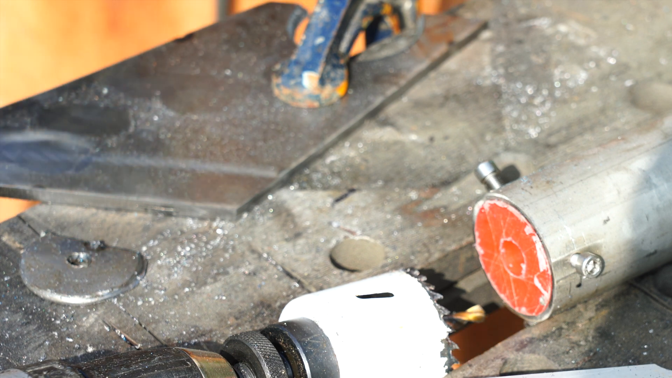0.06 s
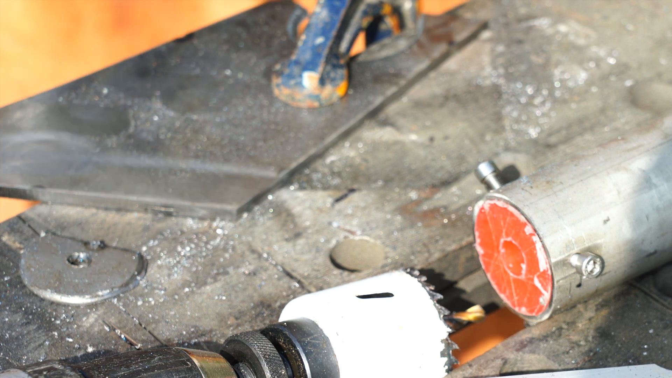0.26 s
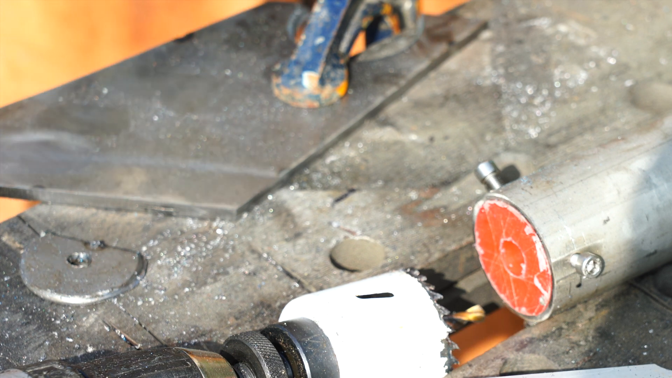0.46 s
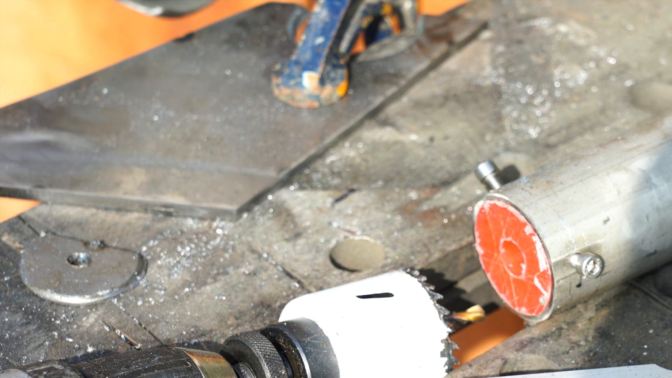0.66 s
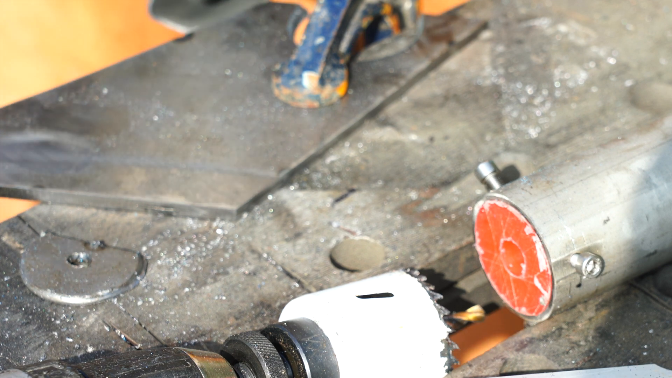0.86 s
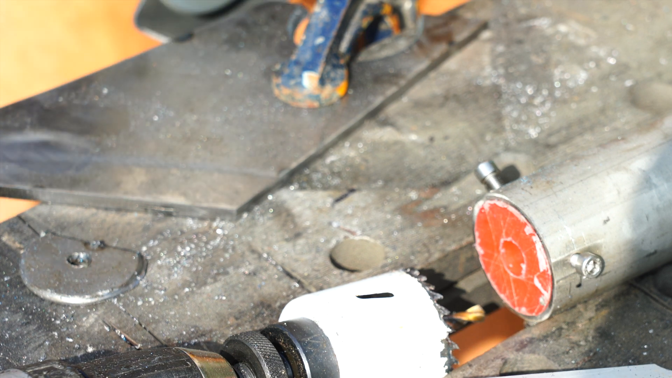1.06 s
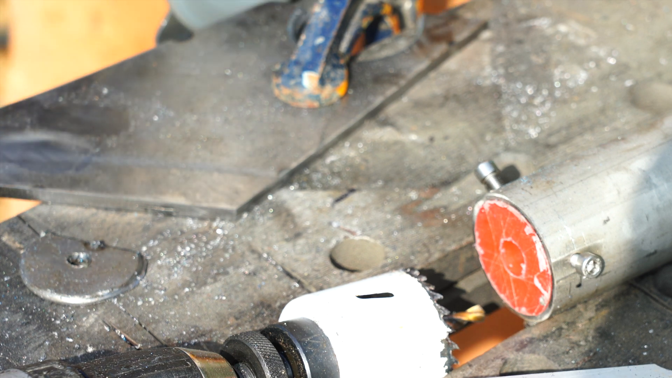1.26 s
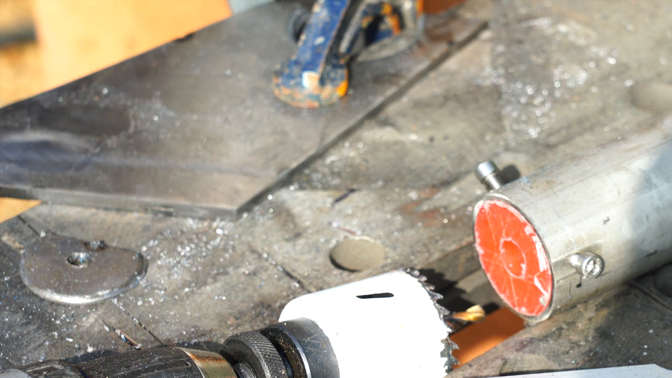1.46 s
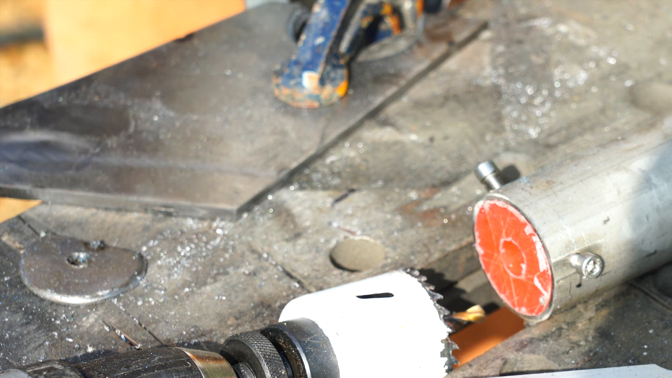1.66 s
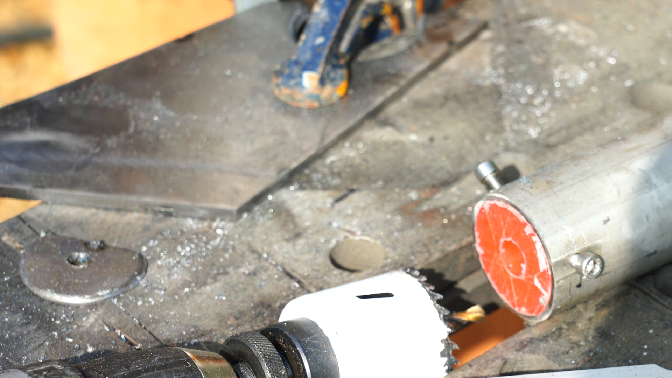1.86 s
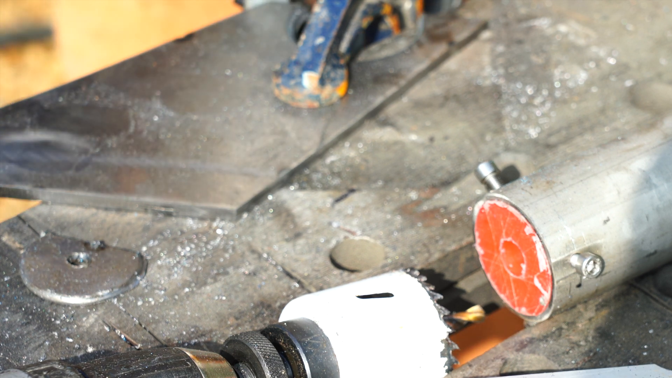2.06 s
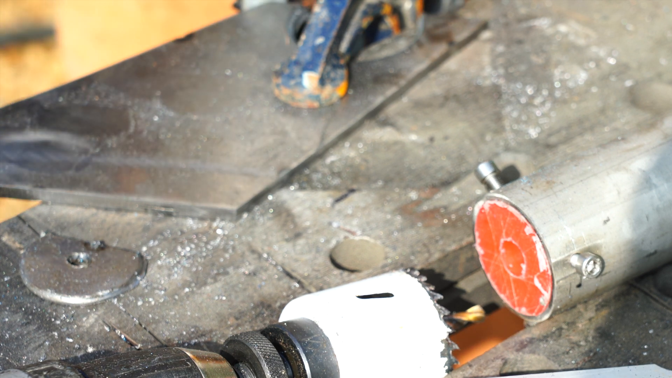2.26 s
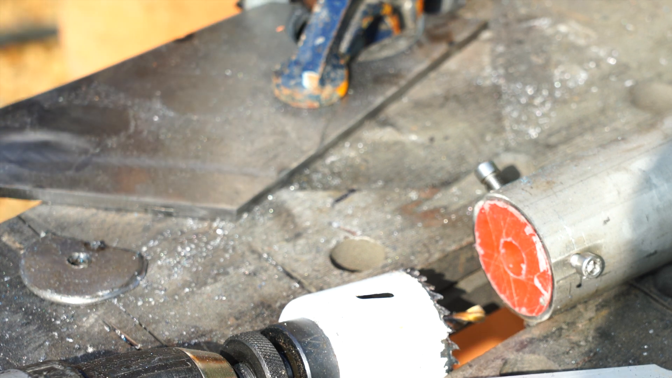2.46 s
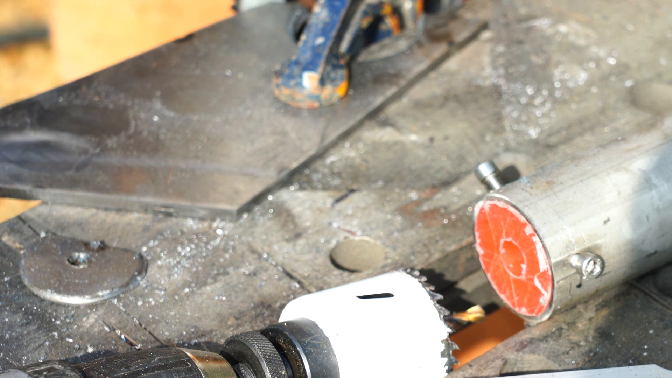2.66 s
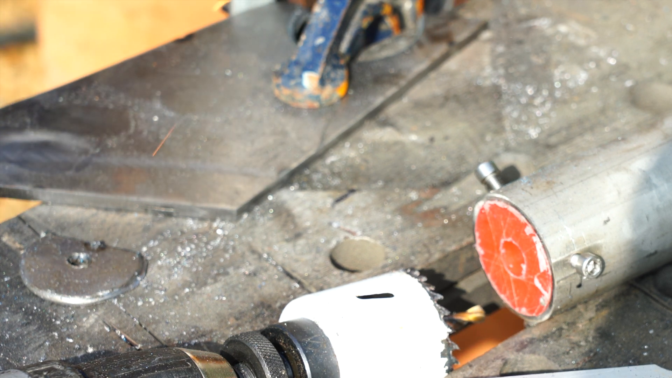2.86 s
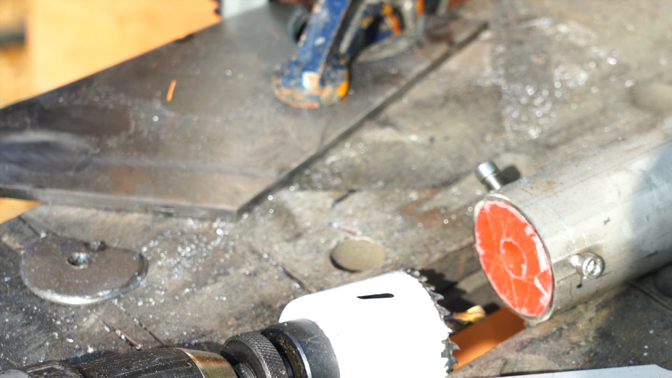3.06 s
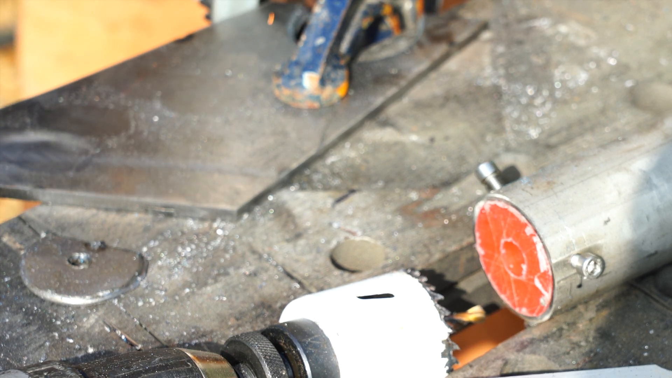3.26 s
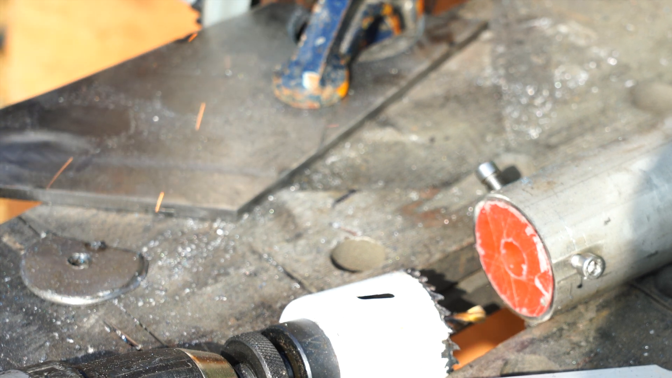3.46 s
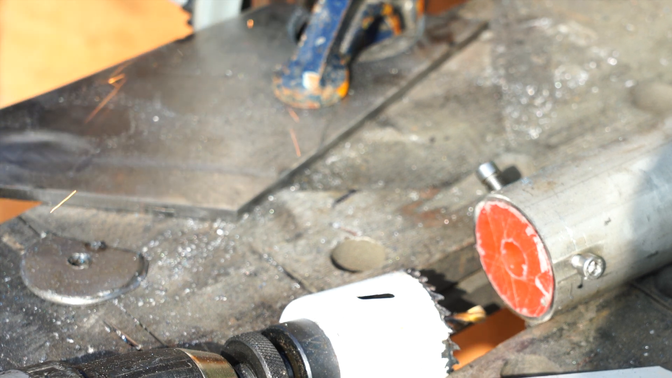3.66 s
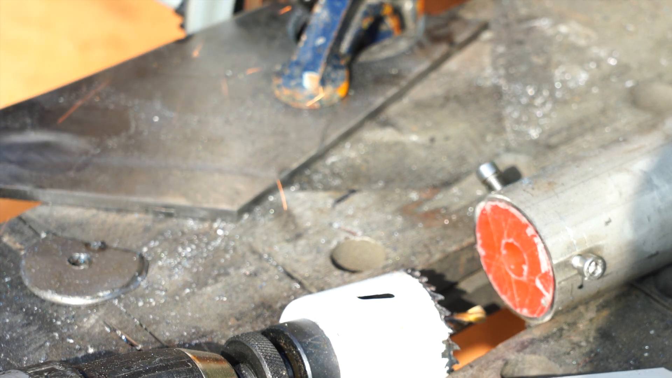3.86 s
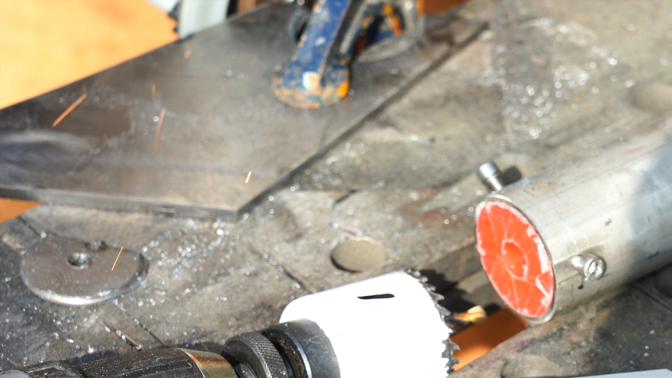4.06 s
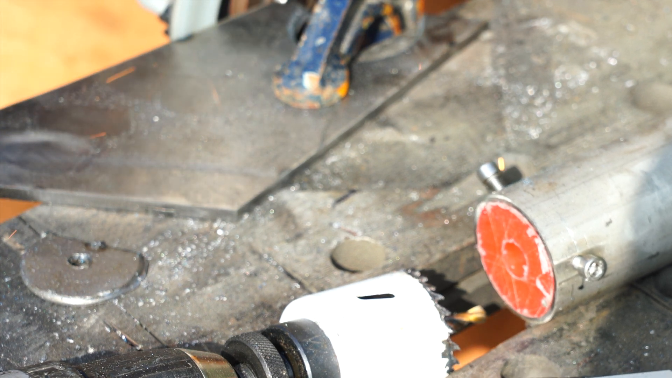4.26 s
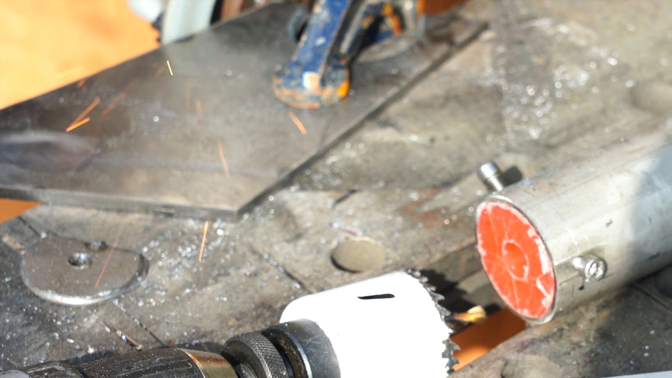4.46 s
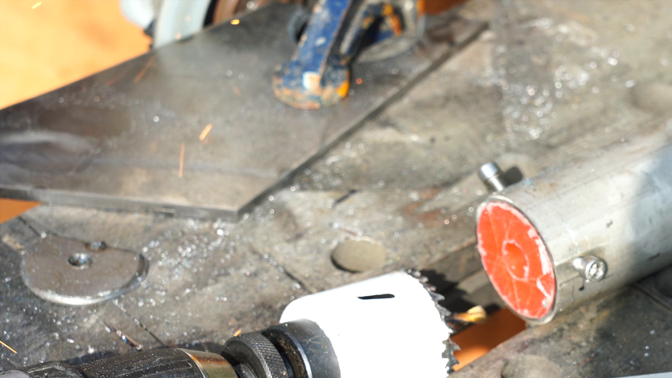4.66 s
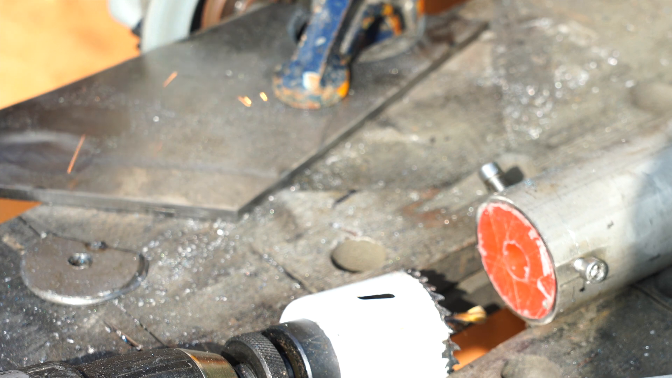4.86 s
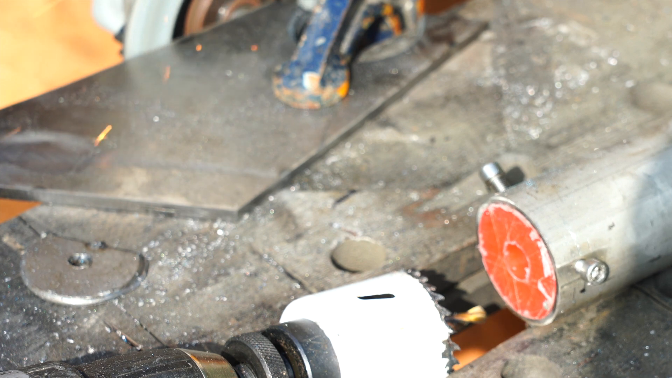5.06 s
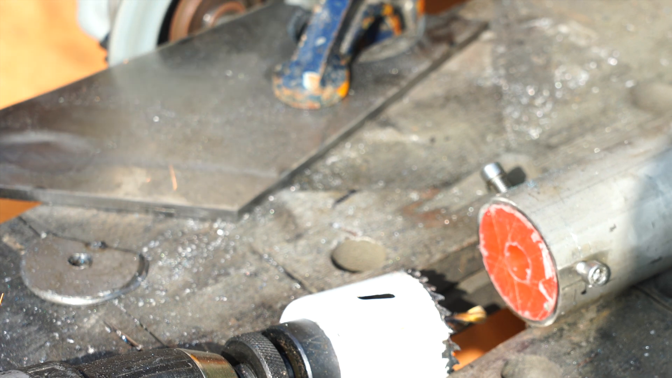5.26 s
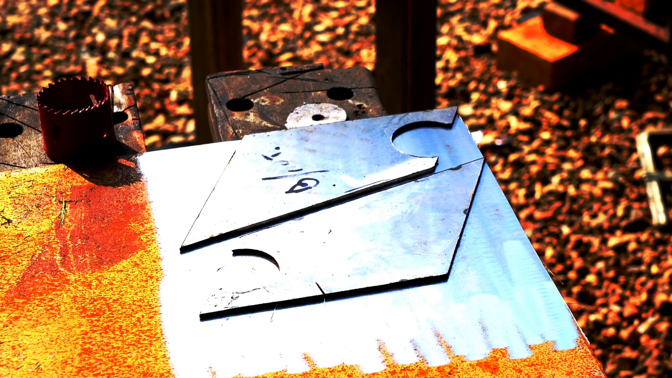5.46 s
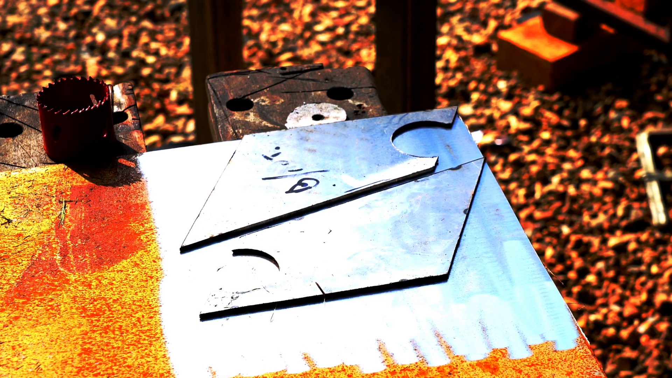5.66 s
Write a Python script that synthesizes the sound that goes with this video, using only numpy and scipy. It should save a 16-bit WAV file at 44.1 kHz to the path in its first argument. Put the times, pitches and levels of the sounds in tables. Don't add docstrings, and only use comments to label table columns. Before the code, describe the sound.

Quiet workshop air with cloth rustle, small knocks and a tiny squeak, then a sharp switch click. An angle grinder runs up with chattering gears into a bright free whir. An abrupt cut brings loud, harsh flap-disc grinding on steel, its pitch sagging under load while metallic tones sing. Close stereo microphones; at the very end it cuts to quiet outdoor air with wind and a far engine.

```python
import sys
import numpy as np
from scipy import signal
from scipy.fft import rfft, irfft
from scipy.io import wavfile
from scipy.ndimage import uniform_filter1d, map_coordinates

SR = 44100
rng = np.random.default_rng(int(sys.argv[2]) if len(sys.argv) > 2 else 0)


def file_out(sig):
    cols = np.atleast_2d(sig).T
    lim = np.clip(cols, -1, 1)
    pcm = np.round(lim * 32767).astype(np.int16)
    wavfile.write(sys.argv[1], SR, pcm)


def invert_db(x):
    u = np.asarray(x, float) / 20
    return 10 ** u


N = 252075
ON, BEAT, TOUCH, OFF = 0.7765, 0.7778, 2.136, 5.468
PINION, CROWN, BLADES, FLAPS = 10, 37, 31, 80
MAINS_HZ = 50.1
DISC_HUM_DB = -59
SIDES = np.array([[0.5], [-0.5]])


def evened(x):
    return x / np.sqrt(np.mean(x ** 2) + 1e-20)


def read(points, hz):
    f, value = np.transpose(points)
    return np.interp(np.log(hz + 1), np.log(f + 1), value)


def curve(rows, t):
    s, *columns = np.transpose(rows)
    return [np.interp(t, s, c) for c in columns]


def bumps(modes, hz):
    return sum(db / (1 + (2 * (hz - f) / width) ** 2) for f, width, db in modes)


def window(t0, t1, rise, fall):
    t = np.arange(N) / SR
    return np.clip(np.minimum((t - t0) / rise, (t1 - t) / fall), 0, 1)


def smooth(x, size):
    return uniform_filter1d(x, size=size)


def ringing(drive, hz, width):
    r = np.exp(-np.pi * width / SR)
    return evened(signal.lfilter([1, 0, -1], [1, -2 * r * np.cos(2 * np.pi * hz / SR), r * r], drive))


# (frequency [Hz], likeness [0-1])
PORT_LIKENESS = [(60, 0.77), (300, 0.96), (1400, 0.97), (3000, 0.82), (4500, 0.84), (6300, 0.91),
                 (7500, 0.66), (12000, 0.63), (15000, 0.16)]
# (frequency [Hz], lead [radians])
PORT_LEAD = [(0, 0.3), (6630, 0), (7490, 1.3), (8440, 0.3), (9130, 1.3), (9650, 0.3), (10700, 1.1),
             (11600, 0.9), (13800, 0.9), (14600, 1.3), (15200, 0.5), (15700, 1.4), (16600, 0)]
# (frequency [Hz], left-right level [dB])
PORT_TILT = [(300, -0.5), (1400, 0), (3000, 3), (5000, 0), (8000, -2), (14000, 2.5)]


def colour(pair, shape, size, patchy_db, pan_db=0, apart=1):
    hz, t, (a, b) = signal.stft(pair, SR, nperseg=size, noverlap=size * 3 // 4)
    hz = hz[:, None]
    colour_db, level_db = shape(hz, t)
    gain = invert_db(colour_db)
    patches = uniform_filter1d(rng.standard_normal(a.T.shape).T, size=size // 80, axis=0)
    patches = uniform_filter1d(patches, size=20480 // size, axis=1)
    gain = gain / np.sqrt((gain ** 2).mean(0)) * invert_db(level_db + patchy_db * evened(patches))
    same = np.clip(read(PORT_LIKENESS, hz), 0, 1) ** apart
    right = same * a * np.exp(-1j * read(PORT_LEAD, hz)) + np.sqrt(1 - same ** 2) * b
    tilt_db = read(PORT_TILT, hz)
    z = np.array([a * invert_db(tilt_db / 2), right * invert_db(-tilt_db / 2)]) * gain
    sound = signal.istft(z, SR, nperseg=size, noverlap=size * 3 // 4)[1][:, :pair.shape[1]]
    return sound * invert_db(SIDES * pan_db)


def tones(speed, orders, levels_db, wobble):
    turns, out = np.cumsum(speed) / SR, np.zeros((2, len(speed)))
    for k, db in zip(orders, levels_db):
        drift = wobble * np.sqrt(k) * evened(smooth(rng.standard_normal(len(speed)), 1500))
        lead = read(PORT_LEAD, k * speed) * SIDES
        out += np.sqrt(2) * invert_db(db) * np.cos(2 * np.pi * k * turns + drift + lead)
    return out


def runup(t):
    top_speed, from_s, time_constant_s = 509.0, 0.8059, 0.3525
    return np.maximum(top_speed * (1 - np.exp(np.minimum((from_s - t) / time_constant_s, 0))), 20)


# (time [s], motor speed [turns/s])
LOADED_SPEED = [(2.13, 498.3), (2.27, 497.3), (2.35, 490.8), (2.45, 474.5), (2.55, 453.9), (2.75, 405.8),
                (2.85, 386.9), (2.95, 372.2), (3.05, 361.6), (3.2, 349.8), (3.5, 335.8), (3.7, 325.3),
                (4.0, 318.0), (4.3, 313.2), (4.6, 319.6), (4.76, 321.0), (5.0, 308.8), (5.48, 300.7)]


def loaded_speed(t):
    return curve(LOADED_SPEED, t)[0]


def load_of(t):
    return np.clip((500 - loaded_speed(t)) / 150, 0, 1)


def edge_of(t):
    return np.clip((t - 4.72) / 0.8, 0, 1)


def grinding():
    t = np.arange(N) / SR
    motor = np.where(t < TOUCH, runup(t), loaded_speed(t))
    speed = motor * PINION / CROWN
    turns = np.cumsum(speed) / SR
    pan_db = 1.3 + 0.5 * (t - 2.5)
    runout = np.cos(2 * np.pi * turns)
    touching = disc_on_steel(worn_surface(turns), pan_db) * (1 + 0.014 * runout)
    touching += grinding_hiss(pan_db) * (1 + 0.047 * runout)
    touching += geared_whine(motor) * invert_db(SIDES * pan_db) * (1 + 0.09 * runout)
    song = singing(turns, speed) * invert_db(SIDES * pan_db) * window(TOUCH - 0.003, OFF + 0.003, 0.004, 0.008)
    return touching * window(TOUCH - 0.003, OFF + 0.005, 0.004, 0.009) + song


def worn_surface(turns):
    rows, cells = 800, 512
    keep = np.exp(-1 / 7.4)
    grit = signal.lfilter([1], np.convolve([1, -keep], [1, -keep]), rng.standard_normal((2, rows, cells)), axis=1)
    orders = rfft(grit)
    grit = irfft(orders / abs(orders) ** 0.55)
    high = uniform_filter1d(rng.standard_normal((rows, cells)), size=40, axis=1, mode="wrap")
    high = evened(uniform_filter1d(high, size=30, axis=0))
    orders = rfft(grit * invert_db(1.6 * high))
    sung = SINGING_LOW + SINGING_HIGH + SINGING_MORE[:10]
    sung = sung + [(3.8, 3.4, CROWN, 0), (3.8, 3.4, FLAPS, 0)] + [(3.9, 2.4, k, 0) for k in DRUM_ORDERS]
    t = np.arange(N) / SR
    for top, length, order, _ in sung:
        first, last = 100 + np.interp([top - length / 2, top + length / 2], t, turns).astype(int)
        orders[:, first:last, int(order)] *= 0.3
    grit = irfft(orders).reshape(2, -1)
    return evened(np.array([map_coordinates(g, [(turns + 100) * cells], order=3) for g in grit]))


# (time [s], disc on steel [dB], gear mesh tone [dB])
GRIND = [
    (2.14, -17, -32.5),
    (2.78, -18, -38),
    (2.93, -17, -26.5),
    (3.1, -18.5, -25.5),
    (3.7, -17.5, -28.5),
    (4.35, -18, -22.5),
    (4.7, -17, -38),
    (4.95, -18.5, -24.5),
    (5.46, -17.5, -49),
]
# (frequency [Hz], density [dB/Hz])
LIGHT = [(88, -50), (150, -25), (446, -10), (492, 8.5), (564, -22), (712, 3), (865, -10), (1300, 1),
         (1740, -6), (2120, -1), (9310, -4), (10700, -3), (15800, -8.5)]
DEEP = [(88, -71), (150, -48), (269, -66), (327, -14), (455, -26.5), (755, -16), (935, -25.5), (1140, -13),
        (1710, -11.5), (3190, -3), (3950, -5), (10700, -13), (15800, -10)]
# (frequency [Hz], width [Hz], gain [dB])
PLATE = [(820, 170, -0.5), (1070, 150, 9.5), (2540, 25, -8), (3260, 360, 1.5), (4570, 160, 2.5),
         (6010, 310, 4.5), (10800, 820, 6.5), (13900, 520, 0)]
# (order [1], width [orders], gain [dB])
FAMILIES = [(37.2, 8, 4), (50.5, 5, 1), (61, 4, -2), (75, 4, 4.5), (80.5, 5, 2), (97, 8, 2), (122, 6, 2.5),
            (150, 10, 2.5)]


def disc_on_steel(surface, pan_db):
    def bite(hz, s):
        load = load_of(s)
        treble_db = 3 + (1.27 - 3) * load
        colour_db = (1 - load) * read(LIGHT, hz) + load * read(DEEP, hz) + (0.5 + 0.5 * load) * bumps(PLATE, hz)
        colour_db = colour_db + bumps(FAMILIES, hz / (loaded_speed(s) * PINION / CROWN))
        colour_db = colour_db + edge_of(s) * bumps([(3780, 1500, 7.2)], hz)
        return colour_db + treble_db * np.clip(np.log2(hz / 5000 + 0.01), -1, 1), curve(GRIND, s)[0]

    return colour(surface, bite, size=1024, patchy_db=1.0, pan_db=pan_db)


# (frequency [Hz], density [dB/Hz])
HISS = [(88, -74), (150, -60), (314, -12), (464, -22.5), (622, -12.5), (1740, -13), (3250, -10),
        (3880, -6.5), (10900, -7.5), (15800, -19)]


def grinding_hiss(pan_db):
    def hiss(hz, s):
        load, hiss_db = load_of(s), -2 - 5 * edge_of(s)
        colour_db = (1 - load) * read(LIGHT, hz) + load * read(HISS, hz)
        return colour_db, curve(GRIND, s)[0] + np.minimum(hiss_db, 2 - 10 * load)

    return colour(rng.standard_normal((2, N)), hiss, size=512, patchy_db=1.33, pan_db=pan_db, apart=0.37)


# (frequency [Hz], level [dB])
UNBALANCE = [(20, -73), (280, -66), (320, -42.5), (350, -38), (400, -32), (450, -39.5), (495, -32.5)]
# (frequency [Hz], level [dB])
FLAP = [(6500, -40), (6750, -35), (7000, -37), (7300, -43), (7700, -36), (8100, -30), (8900, -28),
        (9800, -30.5), (10700, -28.5)]


def geared_whine(motor):
    t, flap = np.arange(N) / SR, FLAPS * PINION / CROWN
    dulled_db = -9 * np.clip((t - 4.5) / 0.15, 0, 1)
    levels_db = [read(UNBALANCE, motor) - 5, curve(GRIND, t)[1] + 0.5, read(FLAP, flap * motor) + dulled_db]
    return tones(motor, [1, PINION, flap], levels_db, 0.028)


# (loudest time [s], length [s], order [1], level [dB])
SINGING_LOW = [(2.25, 0.22, 26, -35), (2.27, 0.25, 16, -37), (2.29, 0.3, 9, -39), (2.54, 0.29, 24, -33),
               (2.55, 0.26, 25, -35), (2.55, 0.7, 28, -30), (2.58, 0.21, 17, -35), (2.72, 0.26, 27, -32),
               (2.73, 0.28, 33, -31), (2.81, 0.23, 29, -33), (2.82, 0.53, 30, -29), (2.84, 0.23, 36, -31),
               (2.88, 0.48, 40, -28), (2.95, 0.22, 15, -38), (2.99, 0.38, 41, -31), (3.0, 0.28, 35, -32),
               (3.28, 0.44, 16, -39), (3.33, 1.17, 42, -27), (3.35, 0.36, 22, -37), (3.4, 0.39, 34, -31),
               (3.42, 0.43, 26, -36), (3.44, 1.04, 7, -44), (3.74, 0.36, 36, -33), (3.83, 0.5, 17, -40),
               (3.91, 0.57, 33, -33), (4.0, 1.74, 38, -28), (4.06, 0.64, 28, -35), (4.08, 0.32, 34, -32),
               (4.22, 2.4, 14, -40), (4.31, 1.41, 15, -42), (4.38, 2.08, 39, -30), (4.42, 0.39, 8, -49),
               (4.57, 1.71, 9, -44), (4.58, 0.76, 36, -29), (4.6, 0.36, 34, -31), (4.67, 0.31, 26, -36),
               (4.68, 0.48, 17, -37), (4.71, 0.31, 40, -33), (4.71, 0.55, 28, -35), (4.72, 0.29, 27, -32),
               (5.03, 0.35, 33, -33), (5.04, 0.42, 8, -48), (5.11, 0.33, 19, -40), (5.2, 0.45, 27, -37),
               (5.2, 0.45, 40, -31), (5.24, 0.38, 36, -32), (5.24, 0.38, 38, -31), (5.3, 0.25, 7, -48)]
# (loudest time [s], length [s], order [1], level [dB])
SINGING_HIGH = [(2.25, 0.22, 45, -30), (2.27, 0.27, 49, -33), (2.28, 0.28, 66, -31), (2.35, 0.43, 115, -37),
                (2.37, 0.46, 79, -29), (2.39, 0.49, 81, -32), (2.52, 0.25, 60, -34), (2.54, 0.25, 85, -32),
                (2.61, 0.3, 90, -31), (2.63, 0.21, 49, -33), (2.64, 0.4, 74, -32), (2.68, 0.34, 93, -34),
                (2.82, 0.36, 81, -33), (2.88, 0.41, 75, -34), (3.01, 0.52, 105, -36),
                (3.04, 0.41, 111, -37), (3.05, 0.57, 62, -35), (3.09, 0.65, 61, -33), (3.11, 0.37, 93, -36),
                (3.21, 0.29, 45, -28), (3.27, 0.38, 63, -36), (3.28, 0.44, 94, -37), (3.49, 0.43, 66, -34),
                (3.53, 0.44, 47, -32), (3.54, 0.48, 98, -36), (3.55, 0.46, 148, -38), (3.57, 0.73, 48, -30),
                (3.68, 0.51, 51, -34), (3.75, 0.74, 56, -36), (3.97, 0.55, 73, -35), (3.97, 1.34, 75, -33),
                (4.01, 0.36, 126, -36), (4.32, 0.88, 123, -35), (4.34, 0.92, 122, -36),
                (4.35, 0.44, 54, -34), (4.41, 0.46, 53, -34), (4.41, 1.25, 52, -30), (4.2, 1.0, 74, -33),
                (4.49, 0.53, 70, -34), (4.6, 0.55, 76, -34), (4.63, 0.48, 94, -37), (4.72, 0.43, 51, -34),
                (4.86, 0.2, 53, -33), (4.98, 0.39, 54, -30), (5.15, 0.54, 62, -33), (5.24, 0.38, 43, -30),
                (5.27, 0.3, 47, -33), (5.32, 0.21, 51, -31)]
# (loudest time [s], length [s], order [1], level [dB])
SINGING_MORE = [(2.96, .26, 11, -32), (3.25, .75, 13, -37.5), (2.58, .14, 10, -36), (2.82, .26, 19, -39),
                (2.92, .18, 20, -38), (2.28, .16, 20, -40), (2.8, .2, 29, -34), (4.98, .2, 35, -33),
                (3.02, .2, 43, -34), (3.16, .18, 44, -35), (3.05, .8, 7.4, -46), (4.2, 1.4, 7.4, -52),
                (5.15, .6, 7.4, -49), (2.7, .5, 7, -48), (5.05, .3, 9, -44), (5.25, .4, 14, -43),
                (5.1, .7, 11, -53), (5.1, .7, 10, -53), (4.3, .6, 10, -50), (4.7, .5, 13, -43)]
DRUM_ORDERS = (10, 12, 13)


def singing(turns, speed):
    t, out, phase = np.arange(N) / SR, np.zeros((2, N)), rng.random(200)
    bite = slice(32, 43)
    phase[bite] = 0.25 * (phase[bite] - 0.5)
    fan_fading = (2.33, 0.43, BLADES * CROWN / PINION, -36)
    disc_hum = (2.3, 0.6, 1, DISC_HUM_DB)
    for top, length, order, db in SINGING_LOW + SINGING_HIGH + [fan_fading, disc_hum] + SINGING_MORE:
        part = slice(round((top - length / 2 - 0.1) * SR), round((top + length / 2 + 0.057) * SR))
        swell_db = np.interp(abs(t[part] - top), [0, length / 2, length / 2 + 0.087], [0.4, -3.0, -40])
        hz = order * speed[part]
        level_db = db + 0.7 + swell_db + read(PORT_TILT, hz) * SIDES
        flutter = 1 + 0.23 * evened(smooth(smooth(rng.standard_normal(len(swell_db)), 500), 500))
        flutter = flutter * (1 + 0.3 * np.clip(order / 30 - 0.6, 0, 1) * np.cos(2 * np.pi * turns[part]))
        angle = 2 * np.pi * (order * turns[part] + phase[int(order)]) + read(PORT_LEAD, hz) * SIDES
        out[:, part] += np.sqrt(2) * flutter * invert_db(level_db) * np.cos(angle)
    drum_hz, drum_width_hz, drum_db, first_db = 1125, 45, -34, 11.0
    biting = load_of(t) ** 0.056 * invert_db(-30 * np.maximum(t - 4.15, 0))
    for step, order in enumerate(DRUM_ORDERS):
        near = biting / (1 + (2 * (order * speed - drum_hz) / drum_width_hz) ** 2)
        level = np.sqrt(2) * invert_db(drum_db + first_db * np.exp(-3 * step))
        out += level * near * np.cos(2 * np.pi * (order * turns + phase[order]))
    return out


def free_running():
    t = np.arange(N) / SR
    beat = 0.78 * np.clip((415 - runup(t)) / 29, 0, 1)
    beats = torque_beats()
    loose = loose_knocks()
    ring = beat_ring(beats, beat) + case_ring(loose, beat) + field_hum()
    sound = gear_rattle(beats, loose, beat) + motor_tones() + ring * invert_db(SIDES * 1.8)
    return sound * window(ON, TOUCH, 0.0008, 0.0061)


# (time [s], peak level [dB])
SLAMS = [(.7774, -16), (.7886, -9), (.7929, -12), (.8087, -6), (.8572, -2), (.866, -6), (.8777, -12),
         (.8866, -11), (.9068, -4.5), (.9177, -16), (.9268, -2), (.9461, -5), (.9652, -7), (.9763, -13),
         (.9862, -5), (1.006, -8), (1.0261, -7), (1.0453, -8), (1.0558, -11), (1.0651, -8), (1.0761, -10),
         (1.0858, -6), (1.1058, -15), (1.1163, -12), (1.1257, -9), (1.1549, -9), (1.1651, -12),
         (1.1866, -13), (1.216, -12), (1.2251, -6), (1.2356, -12), (1.2659, -8), (1.3258, -6)]


def torque_beats():
    chance = rng.standard_normal((600, 2))[:500]
    beats = np.zeros(N + SR)
    at = BEAT - 0.0014 + np.arange(500) / (2 * MAINS_HZ) + 0.001 * chance[:, 0]
    beats[(at * SR).astype(int)] = invert_db(-16 + 1.7 * chance[:, 1])
    slam_s, slam_db = np.transpose(SLAMS)
    replaced = abs(at[:, None] - slam_s).min(1) < 0.003
    beats[(at[replaced] * SR).astype(int)] = 0
    beats[(slam_s * SR).astype(int)] = invert_db(slam_db)
    return beats


def loose_knocks():
    speed = runup(np.arange(N) / SR) / 500
    struck = rng.random(N) < (400 + 1500 * speed) / SR
    return struck * invert_db(1.7 * np.minimum(rng.exponential(1, N), 3))


def beat_ring(beats, beat):
    t = np.arange(400) / SR
    knell = sum(level * np.sin(2 * np.pi * hz * t) for level, hz in [(1, 2050), (0.25, 1500), (0.2, 5160)])
    knell = knell * np.exp(-t / 0.00071) * (1 - np.exp(-t / 0.00052)) ** 2
    return invert_db(1.5) * beat * signal.oaconvolve(beats, knell / knell.max())[:N]


# (frequency [Hz], width [Hz], level [dB])
CASE_RINGS = [(737, 29, -39.5), (5130, 160, -34.5), (8600, 200, -42.5)]


def case_ring(loose, beat):
    t = np.arange(N) / SR
    struck = (loose - loose.mean()) * (t > ON) * (t < TOUCH)
    return (0.43 + 0.31 * beat) * sum(invert_db(db) * ringing(struck, hz, width) for hz, width, db in CASE_RINGS)


# (multiple of the torque beat [1], level [dB], fading [dB/s])
FIELD_HUM = [(4, -40.5, -14), (5, -45, -17), (8, -36.5, -27)]


def field_hum():
    t, out = np.arange(N) / SR, np.zeros(N)
    for k, db, fade_db in FIELD_HUM:
        out += np.sqrt(2) * invert_db(db + fade_db * np.maximum(t - ON, 0)) * np.sin(4 * np.pi * k * MAINS_HZ * t)
    return out


# (frequency [Hz], density [dB/Hz])
SLOW = [(88, -74), (150, -78), (197, -37), (297, -13), (397, -6.5), (659, -9.5), (785, -4), (900, -21),
        (973, -5.5), (2040, -0.5), (3010, -5.5), (5090, -7), (6600, -9), (7100, -16.5), (11000, -26),
        (15800, -34)]
FAST = [(88, -34), (150, -32), (405, -5.5), (564, -4.5), (755, -4.5), (900, -9.5), (1250, 2.5), (1710, -5),
        (4190, 0), (7510, -5), (13700, -10), (15800, -16.5)]
# (frequency [Hz], width [Hz], gain [dB])
HOUSING = [(775, 91, -7), (1980, 150, 9.5), (2610, 130, 10), (3140, 110, 6), (5160, 120, 7.5),
           (9960, 370, 10.5)]


def gear_rattle(beats, loose, beat):
    speed, span = runup(np.arange(N) / SR) / 500, round((TOUCH + 0.1) * SR)
    beats = signal.lfilter([1], [1, -np.exp(-1 / (0.00093 * SR))], beats[:N] ** 0.59)
    loose = signal.lfilter([1], [1, -np.exp(-1 / (0.0019 * SR))], loose)
    drive = 0.32 * beat * smooth(evened(beats), 30) + (1 - beat) * evened(loose)
    drive = drive + 0.44 + 0.21 * speed
    drive = drive / np.sqrt(smooth(drive ** 2, 4000))

    def shape(hz, s):
        fast = np.clip(runup(s) / 490, 0, 1) ** 1.05
        colour_db = (1 - fast) * read(SLOW, hz) + fast * read(FAST, hz) + (1 - 0.56 * fast) * bumps(HOUSING, hz)
        return colour_db, -20 + 3.5 * runup(s) / 500

    rattle, noise = np.zeros((2, N)), rng.standard_normal((2, span))
    rattle[:, :span] = colour(drive[:span] * noise, shape, size=256, patchy_db=1.17, apart=0.99)
    return rattle


# (frequency [Hz], level [dB])
FAN = [(600, -73), (10500, -56), (11900, -34), (13600, -34), (14500, -22.5), (15400, -32)]
# (frequency [Hz], level [dB])
MESH = [(2800, -55), (3050, -38), (3220, -20), (3400, -38), (3700, -62)]


def motor_tones():
    out, span = np.zeros((2, N)), round((TOUCH + 0.1) * SR)
    motor = runup(np.arange(span) / SR)
    hum_db = DISC_HUM_DB + np.interp(motor, (480, 430), [-30, 0])
    levels_db = [read(UNBALANCE, motor), read(FAN, BLADES * motor), hum_db, read(MESH, PINION * motor)]
    out[:, :span] = tones(motor, [1, BLADES, PINION / CROWN, PINION], levels_db, 0.11)
    return out


def handling():
    return knocks() + switch_spring() + squeak()


# (time [s], peak [dB], ring [Hz], second ring [Hz], t60 [s], left-right level [dB])
KNOCKS = [
    (0.058, -39, 230, 503, 0.037, 7),
    (.254, -43.5, 2900, 1500, .02, 5),
    (.344, -45.5, 851, 850, 0.31, 3),
    (.345, -47, 2020, 1300, 0.082, 5),
    (0.348, -42.5, 356, 620, 0.099, 3),
    (0.6815, -25, 6800, 2250, 0.0083, -3),
    (.681, -35, 9200, 2620, 0.014, 8),
]


def knocks():
    out, t = np.zeros((2, N)), np.arange(8000) / SR
    for s, db, hz, second_hz, t60, pan_db in KNOCKS:
        ring = np.sin(2 * np.pi * hz * t) + 0.57 * np.sin(2 * np.pi * second_hz * t)
        crack = 0.41 * rng.standard_normal(len(t)) * np.exp(-t / 0.001)
        at = round(s * SR)
        out[:, at:at + len(t)] += invert_db(db - 60 * t / t60) * (ring + crack) * invert_db(SIDES * pan_db)
    return out


def switch_spring():
    def spring(hz, s):
        modes = [(2300, 1100, 22), (6900, 2000, 20), (9400, 1600, 13), (13000, 4000, 12)]
        return bumps(modes, hz), -37 - 950 * abs(s - 0.682)

    out = np.zeros((2, N))
    out[:, :SR] = colour(rng.standard_normal((2, SR)), spring, size=128, patchy_db=7.0)
    return out * window(0.6808, 0.73, 0.00048, 0.01)


# (time [s], frequency [Hz], width [Hz], level [dB])
SQUEAK = [
    (.19, 7360, 200, -70),
    (.207, 7100, 150, -45),
    (.222, 7050, 200, -47),
    (.235, 7500, 500, -61),
    (.4, 7350, 550, -63),
    (.47, 7400, 500, -64),
]


def squeak():
    def band(hz, s):
        centre, width, db = curve(SQUEAK, s)
        return -20 * np.log10(1 + ((hz - centre) / width) ** 6), db

    out = np.zeros((2, N))
    out[:, :SR] = colour(rng.standard_normal((2, SR)), band, size=256, patchy_db=0.0)
    return out * window(0.18, 0.5, 0.011, 0.03)


def background():
    return rumble() + workshop() + outdoors()


def air(spectrum, level, count, size, patchy_db, pan_db=0, apart=16.0):
    noise = rng.standard_normal((2, count))
    return colour(noise, lambda hz, s: (read(spectrum, hz), level(s)), size, patchy_db, pan_db, apart)


# (frequency [Hz], density [dB/Hz])
LOW = [(12, -49), (20, -9), (59, -8), (201, -9.5), (271, -19), (348, -20), (400, -14), (520, -51),
       (880, -120)]


def rumble():
    def ducked(s):
        duck_db = -15.5 * (1 - np.exp(np.minimum((ON - s) / 0.54, 0)))
        return np.where(s < OFF, -56.5 + duck_db + 6.0 * edge_of(s) ** 0.3, -56.5)

    return air(LOW, ducked, count=N, size=2048, patchy_db=3.0, apart=0.22)


# (frequency [Hz], density [dB/Hz])
SHOP_AIR = [(150, -18), (330, -8), (700, -8), (1200, -14), (3000, -18.5), (8000, -22), (16200, -27)]
# (frequency [Hz], density [dB/Hz])
CLOTH_AIR = [(300, -24), (1500, -4), (2500, 1), (4000, 1), (6000, -3), (8000, -8), (11000, -16),
             (16000, -20)]


def workshop():
    def rustle_db(s):
        return -52.5 + np.interp(s, (0.02, 0.04, 0.22, 0.27), [-12, 2.0, -1.0, -25])

    out = np.zeros((2, N))
    shop = air(SHOP_AIR, lambda s: -53 + 0 * s, count=SR, size=512, patchy_db=2.5)
    cloth = air(CLOTH_AIR, rustle_db, count=SR, size=512, patchy_db=2.0)
    out[:, :SR] = cloth * window(0, 0.3, 0.02, 0.05)[:SR] + shop
    return out * window(-1, 0.86, 0.01, 0.083)


# (frequency [Hz], density [dB/Hz])
YARD_AIR = [(150, -16), (300, -13), (1000, -15), (3300, -24), (5000, -18), (6500, -11), (9000, -17.5),
            (16200, -29)]
# (frequency [Hz], density [dB/Hz])
WIND = [(15, -10), (35, 1), (75, 11), (130, -10), (250, -50)]
# (frequency [Hz], level [dB])
IDLE = [(52, -57), (80, -54)]


def outdoors():
    out, t = np.zeros((2, N)), np.arange(N) / SR
    cut, gust = round(OFF * SR), round((OFF - 0.01) * SR)
    opened = window(OFF - 0.003, 9, 0.005, 0.01)
    yard = air(YARD_AIR, lambda s: -47.5 - 6 * np.exp(-s / 0.05), count=N - cut, size=512, patchy_db=0.0, pan_db=6.0)
    wind = air(WIND, lambda s: 0 * s, count=N - gust, size=1024, patchy_db=1.5, apart=0.2)
    wind_level = invert_db(-66) * window(5.47, 9, 0.1, 0.01) + invert_db(-55) * opened
    out[:, gust:] += wind * wind_level[gust:]
    out += sum(np.sqrt(2) * invert_db(db) * np.sin(2 * np.pi * hz * t) for hz, db in IDLE) * opened
    out[:, cut:] += yard * window(OFF, 9, 0.008, 0.01)[cut:]
    return out


def scene():
    return free_running() + grinding() + background() + handling()


def roll_off(x):
    return signal.sosfilt(signal.butter(12, 16450, fs=SR, output="sos"), x)


def record(dry):
    limited = 0.9 * np.tanh(dry / 0.9)
    mid = signal.sosfilt(signal.butter(2, 42, "high", fs=SR, output="sos"), limited.mean(0))
    side = (limited[0] - limited[1]) / 2
    side = signal.sosfilt(signal.butter(2, 200, "high", fs=SR, output="sos"), side)
    band_edge = signal.firwin(701, 15870, window=("kaiser", 9), fs=SR)
    mix = signal.oaconvolve(np.array([mid + side, mid - side]), band_edge[None], "same")
    return roll_off(mix)


dry = scene()
out = record(dry)
file_out(out)
```